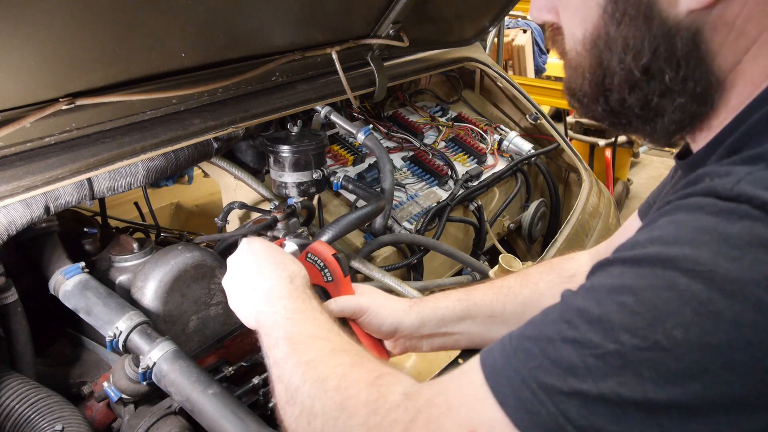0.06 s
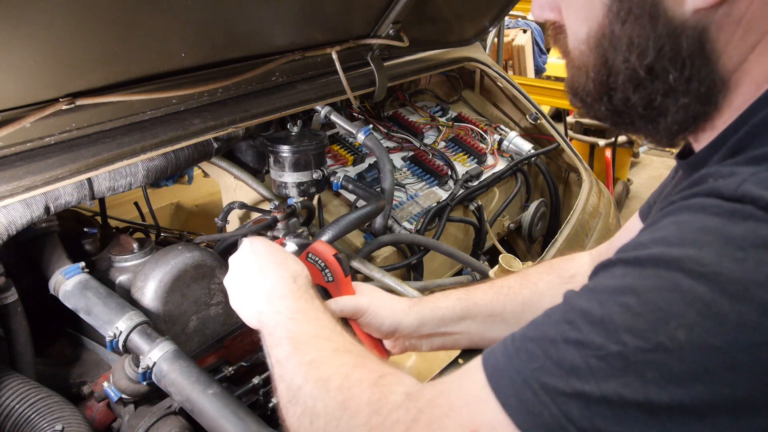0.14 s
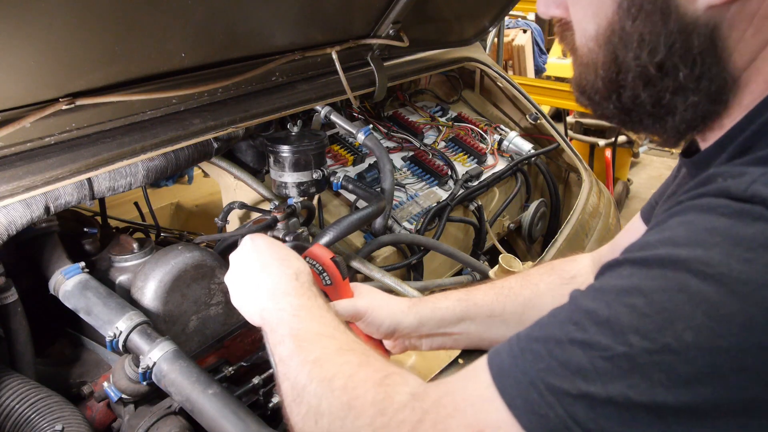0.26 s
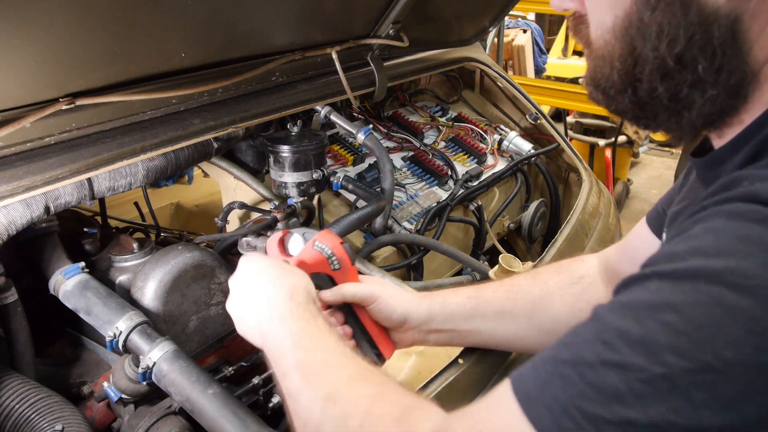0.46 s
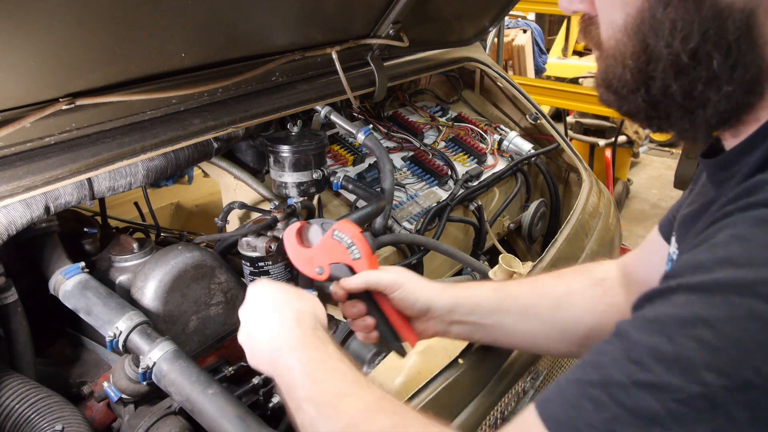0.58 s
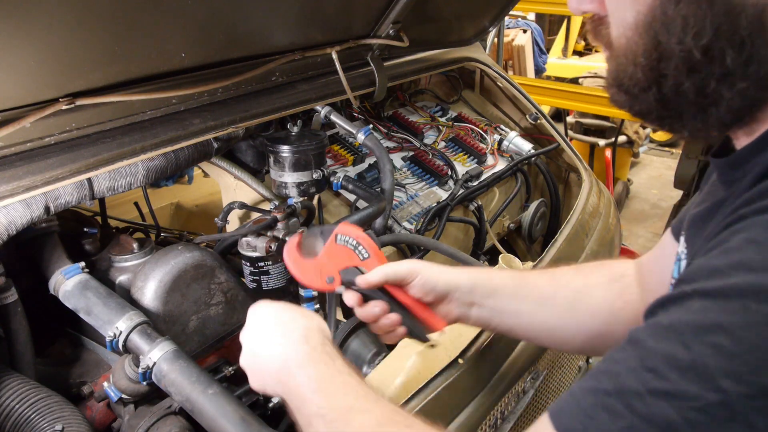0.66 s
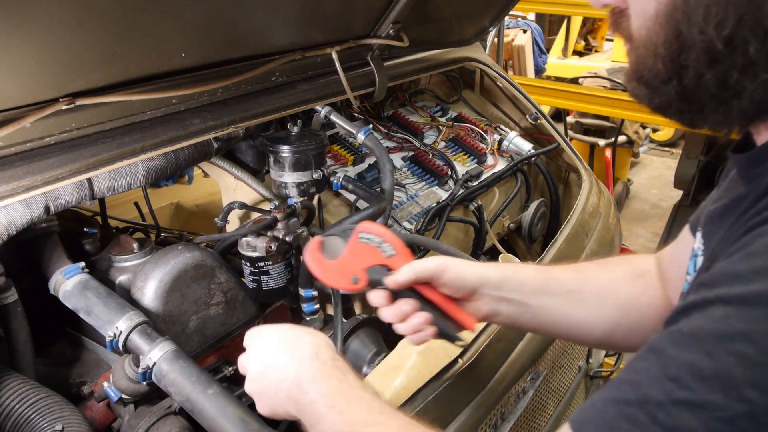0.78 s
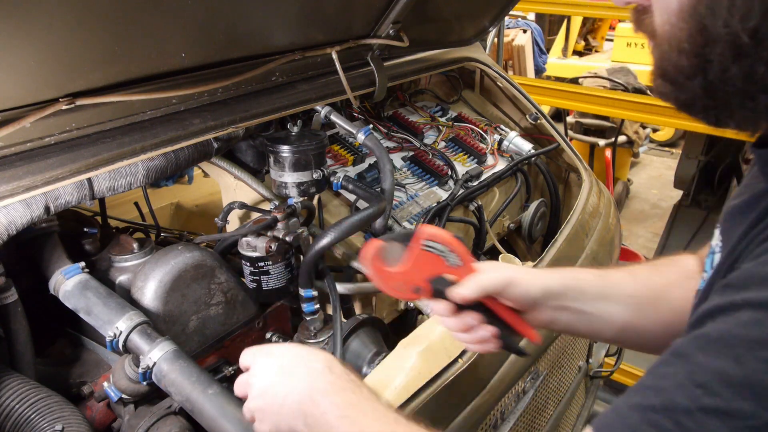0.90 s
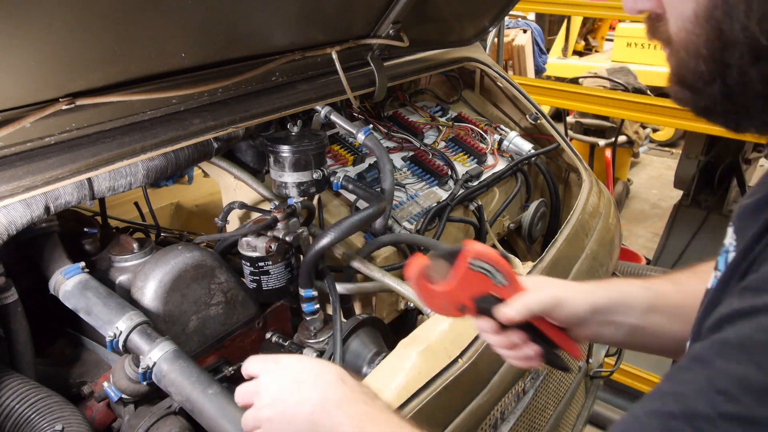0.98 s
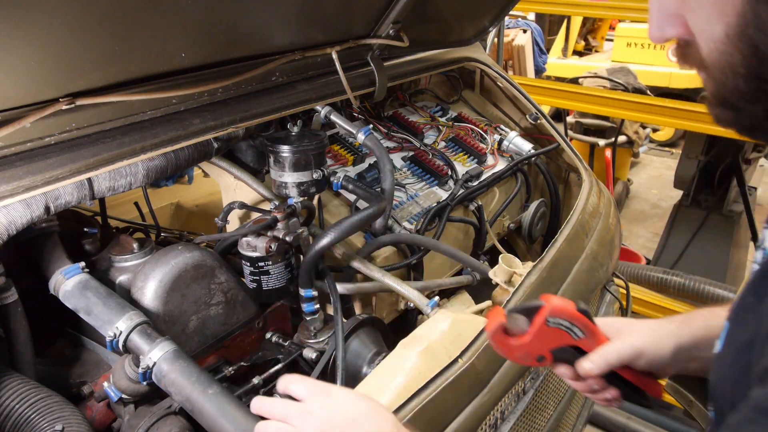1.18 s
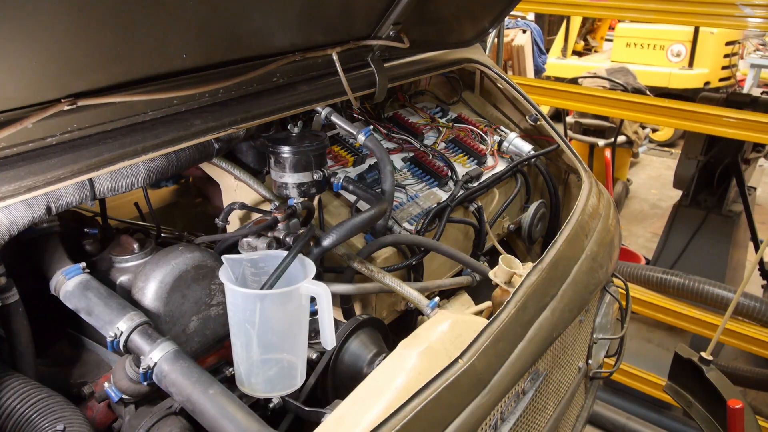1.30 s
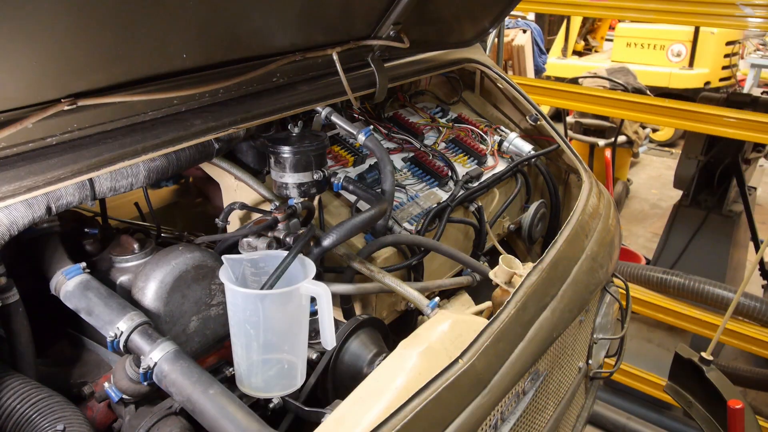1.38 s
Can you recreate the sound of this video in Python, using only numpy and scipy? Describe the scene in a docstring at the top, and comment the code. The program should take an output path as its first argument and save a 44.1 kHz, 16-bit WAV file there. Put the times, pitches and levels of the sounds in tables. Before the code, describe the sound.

A hand cutter snaps sharply through a rubber hose, followed by knocks and rubbing.

```python
"""Over a low handling rumble, a hand cutter clicks and creaks through a rubber hose in an engine bay.
The blade breaks through and the jaws slam, overloading the microphone; the garage rings on while
the gain control recovers. Hand and hose knock against the bodywork and the rubber squeaks.
A hand slides over the edge of the bay, starting with a thin squeal and ending in softer knocks."""
import sys
import numpy as np
from scipy import signal
from scipy.fft import rfft, irfft
from scipy.io import wavfile
from scipy.ndimage import uniform_filter1d

SR = 44100
rng = np.random.default_rng(int(sys.argv[2]) if len(sys.argv) > 2 else 0)


def materialize(psi):
    """Save the field psi as 16-bit PCM at rate SR to the path in sys.argv[1].

    A 1-D psi becomes a single channel; in a 2-D psi each row is a channel.
    """
    bounded = np.clip(np.atleast_2d(psi).T, -1, 1)
    quanta = np.round(bounded * 32767).astype(np.int16)
    wavfile.write(sys.argv[1], SR, quanta)


N = 63945
T = np.arange(N) / SR
# Garage decay. Each row: frequency in Hz, t60 in seconds.
GARAGE_T60 = [(100, .7), (1000, 0.97), (3000, 0.93), (6000, 0.74), (15000, 0.24)]


def amp(db):
    """Decibels to gain."""
    return 10 ** (np.asarray(db) / 20)


def unit(x):
    """Scale to rms 1."""
    return x / np.sqrt(np.mean(x ** 2) + 1e-20)


def interp_log_hz(points, hz):
    """Interpolate (Hz, value) rows over log frequency."""
    point_hz, value = np.transpose(points)
    return np.interp(np.log(hz + 1), np.log(point_hz + 1), value)


def envelope(points):
    """Gain over time from (s, dB) rows."""
    return amp(np.interp(T, *np.transpose(points)))


def add(mix, start_s, sound):
    """Mix a sound in at start_s."""
    part = mix[max(round(start_s * SR), 0):][:len(sound)]
    part += sound[:len(part)]


def colour(x, spectrum):
    """Filter by (Hz, dB) rows, then scale to rms 1."""
    gain = amp(interp_log_hz(spectrum, np.fft.rfftfreq(N, 1 / SR)))
    return unit(irfft(rfft(x) * gain, N))


def noise():
    """White noise of random signs."""
    return rng.choice([-1., 1.], N)


def noise_band(hz, width_oct):
    """Bell-shaped noise band, rms 1."""
    offset = np.log2((np.fft.rfftfreq(N, 1 / SR) + 1) / hz) / width_oct
    return unit(irfft(rfft(noise()) / (1 + offset ** 2), N))


def decay_by_band(x, t60_rows):
    """Decay each frequency according to (Hz, t60 s) rows."""
    hz, t, bins = signal.stft(x, SR, nperseg=256)
    decay = np.exp(-np.log(1000) * t / interp_log_hz(t60_rows, hz)[:, None])
    return signal.istft(bins * decay, SR, nperseg=256)[1][:N]


def fade(t60_s):
    """Exponential decay."""
    return np.exp(-np.log(1000) * T / t60_s)


def attack(rise_s):
    """Exponential rise to 1."""
    return 1 - np.exp(-T / rise_s)


def ring(modes):
    """Struck modes: damped sines of random polarity."""
    return sum(rng.choice([-1, 1]) * amp(db) * fade(t60_s) * np.sin(2 * np.pi * hz * T)
               for hz, db, t60_s in modes)


def resonate(x, hz, width_hz):
    """One resonance, peak gain 1."""
    return signal.lfilter(*signal.iirpeak(hz, hz / width_hz, SR), x)


def low_cut(x, hz, order):
    """Butterworth high-pass."""
    return signal.sosfilt(signal.butter(order, hz, "high", fs=SR, output="sos"), x)


def friction(slips_per_s=7000, spread_db=1.5):
    """Dense tiny slips of uneven size."""
    size = amp(spread_db * np.minimum(rng.exponential(1, N), 4))
    return noise() * size * (rng.random(N) < slips_per_s / SR)


def air(level_db=-57):
    """Steady, dull noise of the still garage."""
    # Each row: frequency in Hz, relative density in dB.
    spectrum = [(20, -2.5), (100, 1), (200, -12.5), (500, -11.5), (1200, -22.5), (3000, -28), (6000, -37.5),
                (16000, -42)]
    return amp(level_db) * colour(noise(), spectrum)


def handling_rumble():
    """Low handling noise, swelling unevenly."""
    # Each row: time in seconds, level in dB.
    levels = [(0, -72), (.2, -58), (.4, -49), (.52, -46.5), (.7, -44), (.9, -49.5), (1.1, -51.5),
              (1.27, -39), (1.35, -43), (1.38, -37), (1.45, -41)]
    # Each row: frequency in Hz, relative density in dB.
    spectrum = [(8, 4.5), (22, -7.5), (40, -9.5), (65, -8), (100, -11), (170, -24), (600, -55.5)]
    return envelope(levels) * colour(noise(), spectrum)


def standing_waves(x):
    """Low room modes of the garage, driven by x."""
    # Each row: frequency in Hz, width in Hz, gain in dB.
    modes = [(110, 8, -1.5), (242, 17, 0), (270, 10, -4), (482, 13, -10.5)]
    return sum(amp(db) * resonate(x, hz, width_hz) for hz, width_hz, db in modes)


def garage_reverb(x, gain_db=-14.5):
    """Diffuse reflections; the treble dies first."""
    tail = decay_by_band(noise(), GARAGE_T60)
    return amp(gain_db) * signal.fftconvolve(x, tail / np.linalg.norm(tail))[:N]


def hose_squeaks(width_oct=0.23):
    """Brief slips of rubber."""
    # Each row: start in seconds, length in seconds, level in dB, centre in Hz.
    squeaks = [(0.87, 0.0079, -42, 1790), (0.974, 0.0091, -48, 1710), (1.267, 0.023, -42, 1230)]
    out = np.zeros(N)
    for start_s, length_s, db, hz in squeaks:
        arch = np.sin(np.pi * np.minimum(T / length_s, 1))
        add(out, start_s, amp(db) * noise_band(hz, width_oct) * arch)
    return out


def hand_squeal(centre_hz=4230, waver_fraction=0.003):
    """One high, wavering mode squeals early in the slide."""
    # Each row: time in seconds, level in dB.
    levels = [(1.07, -69), (1.085, -60.5), (1.10, -71), (1.112, -51.5), (1.13, -61.5), (1.16, -53),
              (1.18, -52)]
    hz = centre_hz * (1 + waver_fraction * unit(uniform_filter1d(noise(), size=200)))
    tone = unit(np.sin(2 * np.pi * np.cumsum(hz) / SR))
    gate = (T > levels[0][0]) * (T < levels[-1][0])
    return tone * gate * envelope(levels)


def hand_slide(rub_db=-2, ring_db=-3, ring_exponent=0.87, treble_hz=1690):
    """Friction excites the panel under the hand; harder pressure brings out its resonances."""
    # Each row: time in seconds, level in dB.
    levels = [(.85, -62), (.96, -56.5), (1.04, -70), (1.09, -53.5), (1.136, -48.5), (1.156, -42.5),
              (1.19, -39.5), (1.21, -39.5), (1.275, -40), (1.30, -47), (1.355, -50.5), (1.39, -46),
              (1.45, -47.5)]
    # Each row: frequency in Hz, relative density in dB.
    spectrum = [(100, -20), (260, 3.5), (380, 6), (650, -5), (1250, 3), (1600, -8), (2000, -10.5),
                (3300, -10), (5500, -20.5), (9000, -24), (16000, -44)]
    # Each row: frequency in Hz, width in Hz, relative level in dB.
    modes = [(331.6, 4.6, -4), (397, 48, -1.5), (572, 15, -1.5), (763, 27, -5.5), (839, 9.3, -9.5),
             (1042, 12, -17.5), (1215, 32, -18), (1900, 58, -8.5), (2425, 20, -13.5), (2736, 28, -11.5),
             (3310, 30, -10), (4540, 29, -10)]
    # Brighter where the hand presses and moves fastest. Each row: time in seconds, treble gain in dB.
    treble_gains = [(1.13, 2.5), (1.165, 5), (1.195, 6), (1.215, -1), (1.27, 0), (1.32, 3.5), (1.39, -5)]
    slips, pressure = friction(), envelope(levels)
    ringing = unit(sum(amp(db) * unit(resonate(slips, hz, width_hz)) for hz, width_hz, db in modes))
    ringing *= (pressure / pressure.max()) ** ring_exponent
    rub = amp(rub_db) * colour(slips, spectrum) + amp(ring_db) * ringing
    treble = signal.filtfilt(*signal.butter(2, treble_hz, "high", fs=SR), rub)
    rub += treble * (envelope(treble_gains) - 1)
    return rub * pressure * (T > levels[0][0])


def bodywork_knocks(ring_db=-2):
    """Padded blows on the bodywork: a hard, bright knock with little bass, then softer, duller thuds."""
    # Each row: start in seconds, gain in dB, low cut in Hz, high cut in Hz, rise in seconds.
    blows = [(.7100, -20.5, 480, 2220, 0.00057), (.7245, -28.5, 60, 1930, 0.0022),
             (0.758, -24.5, 132, 670, 0.0023), (.9320, -36, 252, 1300, 0.002),
             (.9480, -40.5, 355, 860, .003), (1.3700, -39.5, 59.3, 890, 0.0008),
             (1.387, -33, 200, 505, 0.0037), (1.4190, -34, 197, 595, 0.0019)]
    # Each row: frequency in Hz, level in dB, t60 in seconds.
    panel_modes = [(87.1, -6, 0.4), (218.8, -11.5, 0.38), (292, -5, 0.18), (410, -12, 0.24),
                   (490.4, -13, 0.34), (626, -8, 0.074), (780.6, -16, 0.2), (922, -8, 0.077),
                   (1158, -1.5, 0.077), (1351, -5.5, 0.075), (1764, -15, 0.068)]
    # Dense, dull clatter. Each row: frequency in Hz, relative density in dB.
    thud_spectrum = [(40, -42), (100, -2), (155, 3.5), (220, 2), (400, 1), (750, 1.5), (1400, 7.5),
                     (2000, -7.5), (2600, -12.5), (4500, -2), (9000, -23), (16000, -34)]
    # Each row: frequency in Hz, t60 in seconds.
    thud_t60 = [(100, 0.31), (450, 0.29), (1200, 0.07), (4000, 0.25), (12000, 0.2)]
    out = np.zeros(N)
    for start_s, db, low_hz, high_hz, rise_s in blows:
        thud = decay_by_band(colour(noise(), thud_spectrum), thud_t60)
        blow = (thud + amp(ring_db) * ring(panel_modes)) * attack(rise_s)
        blow = low_cut(blow, low_hz, order=1)
        blow = signal.lfilter(*signal.butter(2, high_hz, fs=SR), blow)
        add(out, start_s, amp(db) * blow)
    return out


def cutter_creak():
    """Friction of the handles and of the blade in the hose."""
    # Each row: time in seconds, level in dB.
    levels = [(0, -52.5), (.021, -53), (.036, -46), (.06, -48.5), (.077, -60), (.102, -49.5), (.113, -59),
              (.122, -64.5), (.185, -62), (.228, -49), (.25, -64.5), (.51, -65), (.53, -50.5),
              (.625, -50.5), (.645, -65.5), (1.45, -90.5)]
    # Each row: frequency in Hz, relative density in dB.
    spectrum = [(300, -13.5), (1300, -10.5), (1800, 2), (2600, -3), (4400, 0.5), (6500, -8), (9500, -9.5),
                (16000, -22.5)]
    return envelope(levels) * colour(friction(), spectrum)


def cutter_clicks():
    """Small clicks of pivot and handles."""
    # Each row: start in seconds, level in dB, centre in Hz, width in octaves, t60 in seconds.
    clicks = [(0.0246, -36.5, 5400, 1.5, 0.0062), (0.0308, -39.5, 2060, 0.64, 0.03),
              (0.107, -38.5, 4100, 0.34, 0.039), (0.1103, -41.5, 4200, 1.5, 0.024),
              (0.216, -44.5, 4100, 0.65, 0.067), (0.232, -20, 12000, .7, 0.01),
              (.4530, -53, 10000, .7, .012), (0.4777, -52, 9000, 0.63, 0.02),
              (0.71, -43.5, 6000, 0.62, 0.065), (0.7315, -47.5, 4470, 1.7, 0.055),
              (.7570, -31.5, 7600, 0.93, 0.04), (0.778, -43, 3700, 0.78, 0.077),
              (1.3687, -42.5, 2330, 0.92, 0.03), (1.383, -52.5, 12100, 0.54, 0.066),
              (1.4188, -48.5, 10200, 2.1, 0.011)]
    out = np.zeros(N)
    for start_s, db, hz, width_oct, t60_s in clicks:
        add(out, start_s, amp(db) * noise_band(hz, width_oct) * fade(t60_s))
    return out


def cutter_snap(jolt_db=-42.5, jolt_s=0.0036, echo_db=-21):
    """Two cracks ring the cutter: the breakthrough jolts the tool, the jaw slam fills the garage."""
    # Each row: start in seconds, crack gain in dB, ring gain in dB.
    impacts = [(0.2314, -16, -29.5), (0.2386, -6, -2.5)]
    # Each row: frequency in Hz, level in dB, t60 in seconds.
    cutter_modes = [(370, -18, .035), (895, -10.5, 0.023), (1069, -8, 0.015), (1230, -8.5, 0.015),
                    (1686, -7, 0.036), (1870, -12, 0.037), (2003, -2.5, 0.022), (2620, -14, 0.097),
                    (2995, -4, 0.047), (3440, -29.5, .04), (3960, -12.5, .045), (4223, -13, 0.092),
                    (4780, -16, 0.036), (5145, -16.5, .04), (5850, -17, 0.024), (7000, -17, 0.029),
                    (8710, -14, 0.033)]
    # Each row of both: frequency in Hz, relative density in dB.
    crack_spectrum = [(60, -30.5), (300, -23), (900, -5.5), (2500, 3.5), (4500, 5.5), (7500, -4),
                      (10000, -6), (16000, -17)]
    echo_spectrum = [(100, -20.5), (165, -24.5), (260, -15), (450, -15), (900, -14.5), (1450, -15),
                     (1700, -7.5), (2000, -13), (2380, -2.5), (2650, -10.5), (2990, 3), (3300, -6),
                     (3550, -14), (4350, -4), (5000, -13), (6000, -14), (8000, -21.5), (15000, -41)]
    out = np.zeros(N)
    for start_s, crack_db, ring_db in impacts:
        crack = colour(noise(), crack_spectrum) * fade(t60_s=0.034) * attack(rise_s=0.0002)
        add(out, start_s, amp(crack_db) * crack + amp(ring_db) * ring(cutter_modes))
    out = low_cut(out, hz=302, order=4)  # the tool is too small to radiate bass
    breakthrough_s, slam_s = impacts[0][0], impacts[-1][0]
    age = T / jolt_s
    jolt = age * (2 - age) * np.exp(1 - age)
    add(out, breakthrough_s, amp(jolt_db) * jolt)
    echo = decay_by_band(colour(noise(), echo_spectrum), GARAGE_T60) * attack(rise_s=0.0027)
    add(out, slam_s, amp(echo_db) * echo)
    return out


def scene():
    """Mono mix of sources, garage and rumble; the snap brings its own echo."""
    small_sounds = bodywork_knocks() + cutter_creak() + cutter_clicks()
    small_sounds += hose_squeaks() + hand_slide() + hand_squeal()
    mix = small_sounds + garage_reverb(small_sounds) + cutter_snap() + air()
    return (mix + standing_waves(mix) + handling_rumble())[None]


def record(dry):
    """Gain control ducks after the snap and recovers; the peak clips; a low-pass follows."""
    threshold_db, duck_share, attack_s, release_db_per_s = -14.5, 0.95, 0.008, 44
    ceiling, cutoff_hz = 0.74, 16000
    power_db = 10 * np.log10(abs(uniform_filter1d(dry[0] ** 2, size=64)) + 1e-12)
    release_db = T * release_db_per_s
    held_peak_db = np.maximum.accumulate(power_db + release_db) - release_db
    over_db = np.maximum(held_peak_db - threshold_db, 0)
    pole = np.exp(-1 / (attack_s * SR))
    duck_db = duck_share * signal.lfilter([1 - pole], [1, -pole], over_db)
    clipped = np.clip(dry / amp(duck_db), -ceiling, ceiling)
    low_pass = signal.firwin(511, cutoff_hz, window=("kaiser", 9), fs=SR)
    return signal.oaconvolve(clipped, low_pass[None], "same")


dry = scene()
out = record(dry)
materialize(out)
```